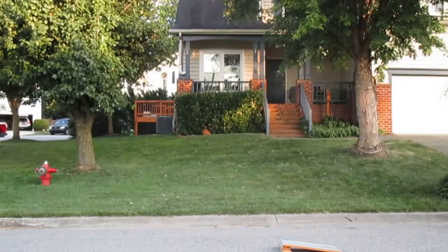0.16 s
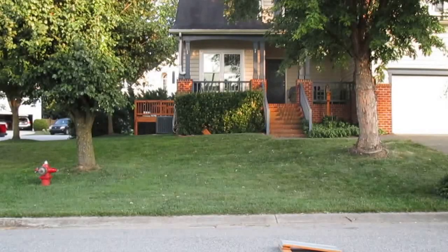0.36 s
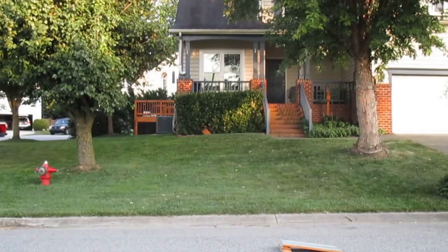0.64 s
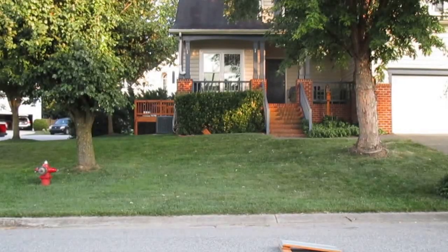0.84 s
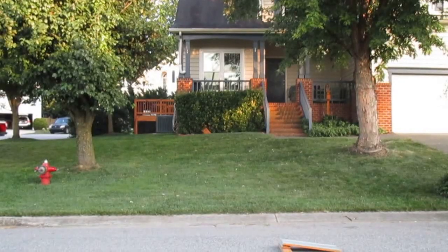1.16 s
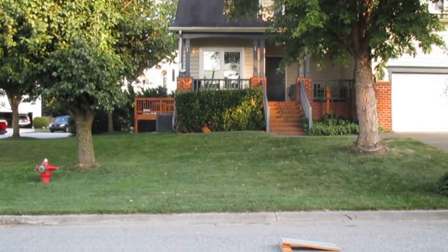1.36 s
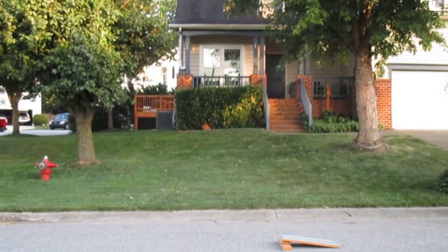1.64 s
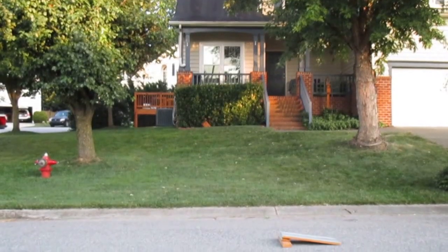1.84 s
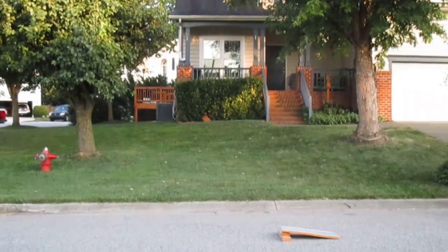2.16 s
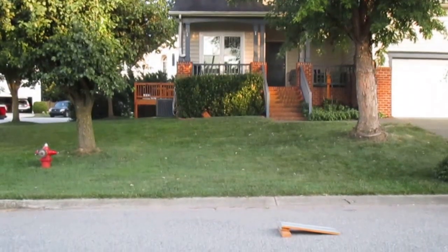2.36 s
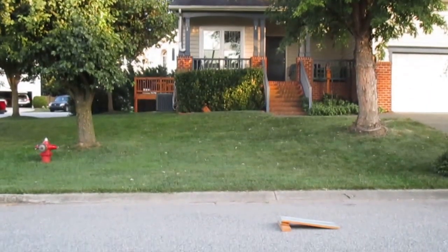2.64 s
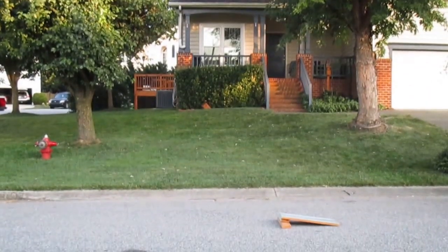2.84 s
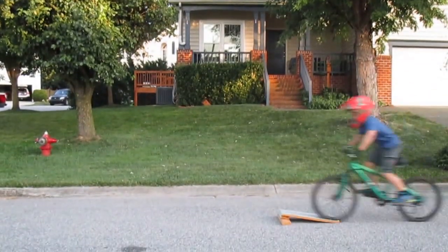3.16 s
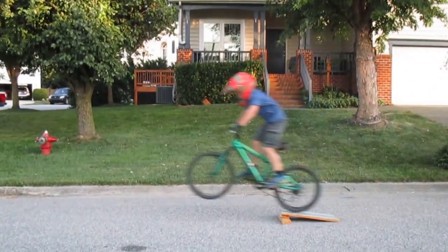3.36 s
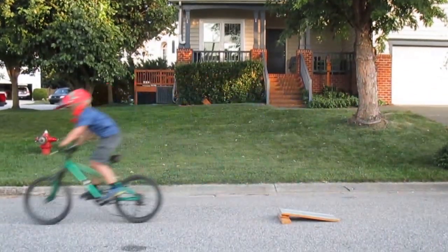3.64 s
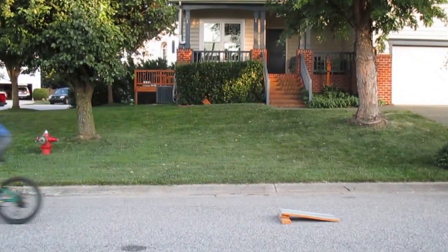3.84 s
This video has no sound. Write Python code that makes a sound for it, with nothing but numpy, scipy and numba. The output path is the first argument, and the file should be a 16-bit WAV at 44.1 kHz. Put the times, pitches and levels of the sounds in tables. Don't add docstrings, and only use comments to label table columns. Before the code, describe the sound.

On a quiet residential street with low rumble and whistling birds, a bicycle rolls in ticking, knocks loudly over a wooden ramp, then lands on pavement with a lighter metallic clatter; mono camera microphone.

```python
import sys
import numpy as np
from scipy import signal
from scipy.fft import rfft, irfft
from scipy.io import wavfile
from scipy.ndimage import uniform_filter1d
from numba import njit

SR = 44100
rng = np.random.default_rng(int(sys.argv[2]) if len(sys.argv) > 2 else 0)


def output_pcm(signal):
    pcm = np.clip(np.atleast_2d(signal).T, -1, 1) * 32767
    wavfile.write(sys.argv[1], SR, np.round(pcm).astype(np.int16))


def natural_amplitude(level_db):
    exponent = np.asarray(level_db, float) / 20
    return 10 ** exponent


N = 176400
T = np.arange(N) / SR

# (frequency [Hz], level [dB], decay t60 [s])
FRAME = [(154, -4, 0.032), (300, -5.5, 0.046), (590, 1, .035), (700, 1, 0.02), (820, -1, 0.036),
         (1140, 2, .02), (1400, 7, 0.019), (1760, 10.5, 0.028), (2520, 7, .014)]
# (time [s], level [dB], contact [ms], favoured pitch [Hz])
KNOCKS = [(3.175, -19.5, .2, 1200), (3.1825, -8.5, 0.48, 455), (3.1875, -12.5, 0.67, 476),
          (3.189, -8.5, 0.65, 576), (3.1942, -9, 0.33, 730), (3.199, -9.5, 0.84, 700),
          (3.22, -12, 0.34, 506), (3.2245, -15.5, 0.51, 600), (3.2369, -11, 0.55, 480),
          (3.241, -19, 1.2, 470), (3.258, -16, 0.2, 965), (3.302, -14, 1, 350), (3.307, -11, 0.27, 1090),
          (3.318, -13, 0.51, 990), (3.3235, 3, 0.74, 564), (3.3254, 3.5, 0.57, 740), (3.3281, -7, .7, 655),
          (3.334, -4, 0.9, 720), (3.3407, 4, 0.13, 1400), (3.344, -3.5, 0.26, 980), (3.3482, -2, 0.68, 665),
          (3.351, -11, 0.35, 700), (3.379, -18, .8, 500), (3.429, -16, 0.83, 647)]
# (time [s], level [dB], contact [ms], favoured pitch [Hz])
LANDINGS = [
    (3.6848, -14, 0.17, 230),
    (3.7013, -8.5, 0.17, 1800),
    (3.7047, -11, 0.28, 700),
    (3.715, -20, 0.85, 300),
    (3.729, -21, .5, 700),
    (3.779, -26, 0.8, 580),
]


def unit(x):
    return x / np.sqrt(np.mean(x ** 2))


def curve(table, col=1):
    return np.interp(T, [row[0] for row in table], [row[col] for row in table])


def walk(rate):
    hold = int(SR / rate)
    steps = np.repeat(rng.standard_normal(N // hold + 1), hold)
    return unit(uniform_filter1d(uniform_filter1d(steps, hold), hold)[:N])


def band(x, hz, width_hz):
    edges = np.clip([hz - width_hz / 2, hz + width_hz / 2], 10, .45 * SR)
    return signal.sosfilt(signal.butter(2, edges, "band", fs=SR, output="sos"), x)


def coloured(x, table, flicker_db):
    f = np.maximum(np.fft.rfftfreq(N, 1 / SR), 10)
    hz, db = np.array(table).T
    spectrum = rfft(x) * natural_amplitude(np.interp(np.log(f), np.log(hz), db))
    out = np.zeros(N)
    for octave in range(11):
        weight = np.clip(1 - abs(np.log2(f / 20) - octave), 0, 1)
        out += irfft(spectrum * weight, N) * natural_amplitude(flicker_db * walk(9.26))
    return unit(out)


def tone(hz, gain):
    return np.sqrt(2) * gain * np.sin(2 * np.pi * np.cumsum(hz) / SR)


def struck(events, body, scatter_db, detune, focus_db, length=.2):
    out, t = np.zeros(N + SR), np.arange(int(length * SR)) / SR
    mode_hz, mode_db, t60 = np.array(body).T[:, :, None]
    chance = rng.standard_normal((len(events), 2, len(body), 1))
    for (s, db, ms, hz), (level_chance, pitch_chance) in zip(events, chance):
        mix_db = mode_db + scatter_db * level_chance - focus_db * np.log2(mode_hz / hz) ** 2
        decay = np.exp(-np.log(1000) * t / t60)
        ring = natural_amplitude(mix_db) * decay * np.sin(2 * np.pi * mode_hz * (1 + detune * pitch_chance) * t)
        contact = np.hanning(int(ms * SR / 1000) + 3)
        y = np.convolve(-ring.sum(axis=0), contact)[:len(t)]
        i = int(s * SR)
        out[i:i + len(t)] += natural_amplitude(db) * y / abs(y).max()
    return out[:N]


def bursts(events):
    out, t = np.zeros(N + SR), T[:SR // 20]
    grit = rng.standard_normal(N + SR) * natural_amplitude(2.0 * np.resize(walk(900.), N + SR))
    for s, db, ms, hz in events:
        i = int(s * SR)
        shape = np.clip(t / 0.00069, 0, 1) * np.exp(-t * 1000 / ms)
        out[i:i + len(t)] += natural_amplitude(db) * shape * unit(band(grit[i:i + len(t)], hz, 1.03 * hz))
    return out[:N]


def background():
    # (frequency [Hz], density [dB per Hz])
    town_colour = [(30, -9.5), (80, -4), (380, -20.5), (424, -24), (977, -24.5), (7180, -57.5),
                   (15700, -60)]
    # (time [s], level [dB])
    hum_level = [(.3, -39.5), (1.15, -52), (1.4, -38.5), (2.1, -36), (2.3, -53), (2.6, -34.5), (3.0, -48),
                 (3.25, -30.5), (4.0, -52)]
    town = natural_amplitude(-38.5 + 0.46 * walk(2.4)) * coloured(rng.standard_normal(N), town_colour, 0.42)

    hum = np.zeros(N)
    for harmonic, db in ((1, -3.5), (2, -9.5)):
        hz = harmonic * 76.9 * (1 + 0.0203 * walk(6.))
        hum += tone(hz, natural_amplitude(curve(hum_level) + db) * (1 + 0.19 * walk(6.8)))

    whine_hz = 11823
    whine_noise = unit(band(rng.standard_normal(N), whine_hz, 150))
    whine = natural_amplitude(-76.5) * unit(tone(np.full(N, whine_hz), 1) + 0.25 * whine_noise)

    throb_s, first_throb_s, depth_db = .226, 0.45, 4
    throb_db = depth_db * np.cos(2 * np.pi * (T - first_throb_s) / throb_s) + 1.1 * walk(3.8)
    throb_db -= 14 * np.clip(T - 2.5, 0, 1)
    insect = natural_amplitude(-66 + throb_db) * unit(band(rng.standard_normal(N), 7090, 630))
    return town + hum + whine + insect


def tyres():
    # (time [s], level [dB])
    roll_level = [(.2, -51), (1.6, -46.5), (2.2, -43.5), (2.8, -38), (3.07, -40.5), (3.4, -24.5),
                  (3.47, -36), (3.608, -50.5), (3.616, -39), (3.67, -43.5), (3.7, -26), (3.8, -38),
                  (4.0, -48.5)]
    # (frequency [Hz], density [dB per Hz])
    tyre_colour = [(150, -3.5), (450, 3.5), (800, 4), (1350, -6), (1900, -9), (2500, -14.5), (3200, -19.5),
                   (9000, -31)]
    # (time [s], level [dB])
    chain_level = [(.2, -65.5), (2.35, -59.5), (2.7, -56.5), (2.95, -65), (3.3, -58), (3.55, -57),
                   (3.75, -52), (4.0, -60.5)]
    # (frequency [Hz], density [dB per Hz])
    link_colour = [(2500, -32), (4000, 0), (6800, -3), (9300, -2.5), (12000, -6), (15500, -21)]
    # (time [s], level [dB])
    tread_level = [(1.6, -61.5), (2.3, -54), (2.55, -53), (2.82, -49.5), (2.92, -59), (4.0, -58)]
    # (time [s], level [dB], favoured pitch [Hz])
    stones = [
        (2.5753, -27, 1870),
        (2.6262, -25, 1400),
        (2.8086, -25, 1790),
        (2.8688, -21, 1320),
        (2.9024, -26, 1010),
    ]
    grain_db = np.array([[2.0], [3.0]]) * rng.exponential(size=(2, N // 16 + 1)).repeat(16, axis=1)[:, :N]
    road_grit, chain_grit = rng.standard_normal((2, N)) * natural_amplitude(grain_db)

    tread_hz, width_hz = 2090, 950
    tread = unit(band(band(road_grit[::-1], tread_hz, width_hz), tread_hz, width_hz))
    drone = natural_amplitude(curve(tread_level) + 3.0 * walk(40.)) * tread
    pops = struck([(s, db - 1, 0.14, hz) for s, db, hz in stones], FRAME, 4.3, 0.058, 3.5, .05)
    hiss = natural_amplitude(curve(roll_level)) * coloured(road_grit, tyre_colour, 1.6)
    sizzle = natural_amplitude(curve(chain_level)) * coloured(chain_grit, link_colour, 0.96)
    return drone + pops + hiss + sizzle


def far_knocks():
    # (time [s], level [dB])
    knocks = [
        (0.359, -30.5),
        (0.68, -31),
        (1.002, -31),
        (1.32, -30),
        (1.856, -25.5),
        (1.936, -24.5),
    ]
    # (frequency [Hz], level [dB], decay t60 [s])
    far_body = [(870, 7, 0.024), (1380, 2, 0.029)]
    return struck([(s, db, .3, 1100) for s, db in knocks], far_body, 1.7, 0.018, 0)


def birds():
    # (time [s], pitch [Hz], level [dB])
    whistles = [
        [(.54, 4440, -62), (.552, 4380, -47), (.566, 3790, -49), (.58, 3750, -47), (.6, 4000, -55.5),
         (.612, 4000, -67)],
        [(.669, 5190, -59), (.69, 5250, -53), (.71, 4700, -43.5), (.722, 3720, -50), (.735, 3120, -55),
         (.755, 2700, -59)],
        [(.802, 4270, -62), (.815, 4230, -48), (.826, 4600, -51), (.831, 3600, -51.5), (.853, 2750, -52.5)],
        [(2.44, 3450, -71), (2.46, 3490, -57), (2.495, 3450, -64)],
        [(2.77, 3520, -66), (2.8, 3500, -63), (2.84, 3500, -63)],
    ]
    # (time [s], top pitch [Hz], hold [s], fall [s], level [dB])
    notes = [
        (0.915, 4350, .022, 0.028, -51.5),
        (1.034, 4200, 0.016, 0.033, -53),
        (2.022, 4900, 0.0037, 0.044, -52),
        (2.106, 4770, 0.0054, 0.042, -51.5),
        (2.197, 4800, 0.0031, 0.036, -51.5),
        (2.277, 4600, .004, 0.041, -53),
        (2.372, 4700, .003, 0.0216, -57),
        (3.837, 4910, 0.001, 0.038, -48.5),
        (3.918, 4600, 0.011, 0.033, -52),
    ]
    out = np.zeros(N)
    for w in whistles:
        sounding = (T > w[0][0]) * (T < w[-1][0])
        out += tone(curve(w), natural_amplitude(curve(w, col=2)) * sounding)

    bottom_hz, bend, hook = 2710, .85, 0.037
    for s, hz, hold, fall, db in notes:
        fallen = np.clip((T - s - hold) / fall, 0, 1)
        glide = np.sin(np.pi / 2 * fallen) ** bend
        glide += hook * (1 - np.clip((T - s) / hold, 0, 1))
        gain = np.clip((T - s) / 0.0064, 0, 1) * np.clip((1 - fallen) / 0.48, 0, 1)
        out += tone(hz + (bottom_hz - hz) * glide, natural_amplitude(db) * gain)
    return out * natural_amplitude(1.5 * walk(150.))


def house_echo(song):
    delay_s, spread_s, t = 0.051, 0.079, T[:SR // 4]
    fronts = rng.standard_normal(len(t)) * np.exp(-(t - delay_s) / spread_s) * (t > delay_s)
    return natural_amplitude(-9) * signal.fftconvolve(song, fronts / np.sqrt(np.sum(fronts ** 2)))[:N]


def metal():
    # (time [s], level [dB], length [ms], centre [Hz])
    rattles = [(1.936, -49, 6, 8100), (2.4585, -44, 4.2, 8000), (2.626, -42, 4.8, 4500),
               (2.868, -34, 1.5, 5940), (3.174, -43, 14, 4600), (3.2567, -33.5, 5.1, 5070),
               (3.306, -31.5, 8.9, 6550), (3.34, -33, 1.8, 3600), (3.364, -40, 8, 4200),
               (3.385, -37, 14, 2800), (3.612, -32.5, 21, 1200), (3.631, -35, 4.2, 6500),
               (3.667, -30.5, 5, 5900), (3.685, -40, 6, 9500), (3.7, -30.5, 7.8, 7500),
               (3.713, -41, 5.2, 10000), (3.731, -34.5, 5, 7000), (3.743, -39, 6.1, 10300)]
    # (time [s], level [dB], contact [ms], favoured pitch [Hz])
    clinks = [
        (3.341, -22, .03, 4100),
        (3.3655, -21, .03, 9500),
        (3.667, -33, .03, 4300),
        (3.701, -18.5, .03, 4300),
        (3.702, -24, .03, 9000),
        (3.7315, -29, .03, 8000),
    ]
    # (frequency [Hz], level [dB], decay t60 [s])
    stay = [(4230, 9, 0.024), (5200, -5, 0.025), (5700, -4, 0.025), (9000, -2, 0.047), (10000, 2, .035)]
    # (time [s], level [dB], length [ms], pitch [Hz])
    squeaks = [
        (3.66, -24, 4.4, 10830),
        (3.663, -24, 3.2, 10500),
    ]
    cracks = [(s, db - 24 - 9 * ms, 3.0, 2400) for s, db, ms, hz in KNOCKS + LANDINGS]
    out = bursts(rattles) + bursts(cracks) + struck(clinks, stay, 2.1, 0.011, 18, .05)
    for s, db, ms, hz in squeaks:
        phase = np.clip((T - s) * 1000 / ms + 0.18, 0, 1)
        out += tone(hz * (1 + 0.029 * walk(350.0)), natural_amplitude(db) * np.sin(np.pi * phase) ** 2)
    return out


def freewheel():
    # (time [s], teeth passed [count])
    teeth = [(2.41, 0), (2.868, 37), (3.035, 48), (3.094, 51), (3.2563, 65), (3.4647, 82), (3.4955, 84),
             (3.6133, 93), (3.768, 106), (3.8147, 111), (3.876, 117), (3.9154, 120), (4.003, 128)]
    # (time [s], level [dB], ring centre [Hz])
    tick = [(2.4, -44.5, 8600), (2.58, -45, 6500), (2.8, -41, 6600), (3.0, -45.5, 11000),
            (3.23, -37, 10000), (3.5, -38.5, 5900), (4.0, -40, 10500)]
    # (frequency [Hz], level [dB], decay t60 [s])
    hub = [(5300, -5, .015), (6240, 1, 0.024), (7100, 3, 0.017), (8600, 2, 0.011), (10000, 7, 0.013),
           (11400, 5, .01), (14500, -3, 0.009)]
    tooth_s, count = np.array(teeth).T
    tick_s, tick_db, tick_hz = np.array(tick).T
    chance = rng.standard_normal((int(count[-1]), 2))
    at = np.interp(np.arange(len(chance)), count, tooth_s) + 0.00039 * chance[:, 0]
    db = np.interp(at, tick_s, tick_db) + 2 * chance[:, 1]
    ticks = list(zip(at, db, np.interp(at, tick_s, tick_hz)))
    snap = bursts([(a, d - 5, 1.3, hz) for a, d, hz in ticks])
    return snap + natural_amplitude(-1.5) * struck([(a, d, .03, hz) for a, d, hz in ticks], hub, 3, 0.02, 16, .015)


def plank_ramp():
    # (frequency [Hz], level [dB], decay t60 [s])
    plank = [(210, 2, .05), (343, -11, 0.025), (398, -5, 0.025), (484, 2, 0.073), (667, 3.5, 0.037),
             (720, 0, 0.074), (793, -3, 0.058), (980, -1.5, 0.04), (1200, 3, 0.035), (1570, 5, 0.025),
             (2233, 2.5, 0.056), (2650, 3, 0.038)]
    return struck(KNOCKS, plank, 4.2, 0.029, 24.5)


def landing():
    return struck(LANDINGS, FRAME, 2.3, 0.038, 3.3)


def street(x):
    t60_s, t = 0.38, T[:SR // 2]
    tail = band(rng.standard_normal(len(t)), 2710, 5340)
    tail *= np.exp(-np.log(1000) * t / t60_s) * np.clip(t / 0.0042, 0, 1)
    return signal.fftconvolve(x, natural_amplitude(-21.5) * tail / np.sqrt(np.sum(tail ** 2)))[:N]


def scene():
    song = birds()
    song = song + house_echo(song)
    hits = far_knocks() + plank_ramp() + landing()
    hits = signal.sosfilt(signal.butter(2, 110, "high", fs=SR, output="sos"), hits)
    near = hits + metal() + freewheel() + song
    return (near + street(near) + tyres() + background())[None]


@njit
def follow(x, attack, release):
    e, out = 0., np.empty(len(x))
    for i in range(len(x)):
        e += (abs(x[i]) - e) * (attack if abs(x[i]) > e else release)
        out[i] = e
    return out


def roll_off(x):
    return signal.sosfilt(signal.butter(12, 15840, fs=SR, output="sos"), x)


def record(dry):
    start_s, attack_s, release_s = .206, 0.018, 0.23
    threshold_db, ratio = -26.5, 1.915
    envelope = follow(dry[0], 1 / (attack_s * SR), 1 / (release_s * SR))
    gain = np.minimum(1, natural_amplitude(threshold_db) / (envelope + 1e-9)) ** (1 - 1 / ratio)
    x = np.clip(dry * gain * natural_amplitude(2.5), -.85, 1)
    x = x * np.clip((T - start_s) / 0.0045, 0, 1)
    x = signal.lfilter(*signal.butter(1, 13000, fs=SR), x)
    x = signal.sosfilt(signal.ellip(8, .2, 70, 15750, fs=SR, output="sos"), x)
    return roll_off(x)


dry = scene()
out = record(dry)
output_pcm(out)
```